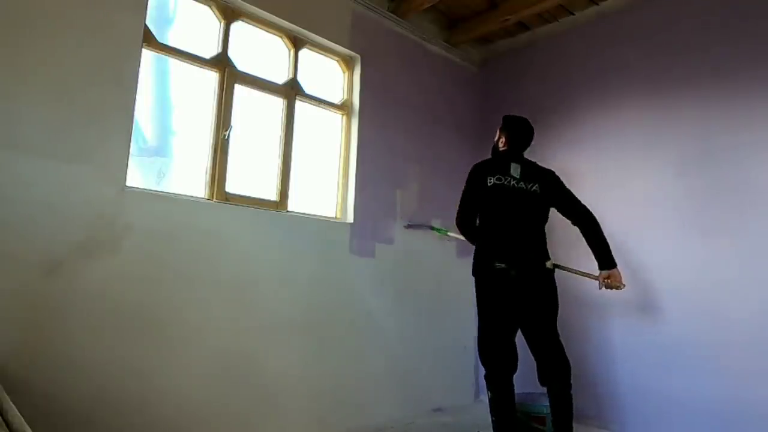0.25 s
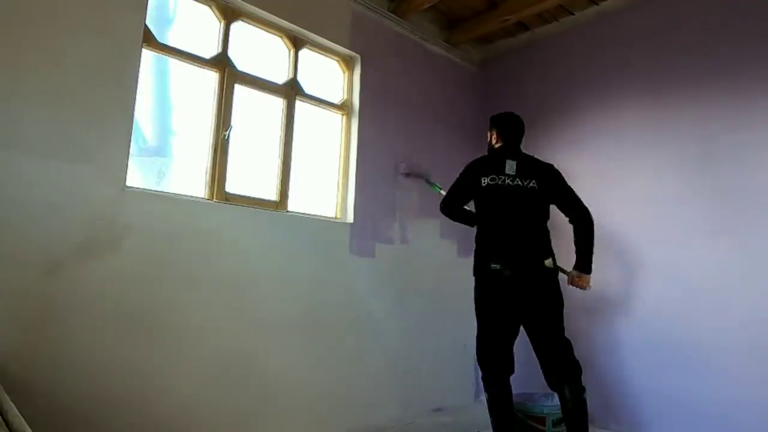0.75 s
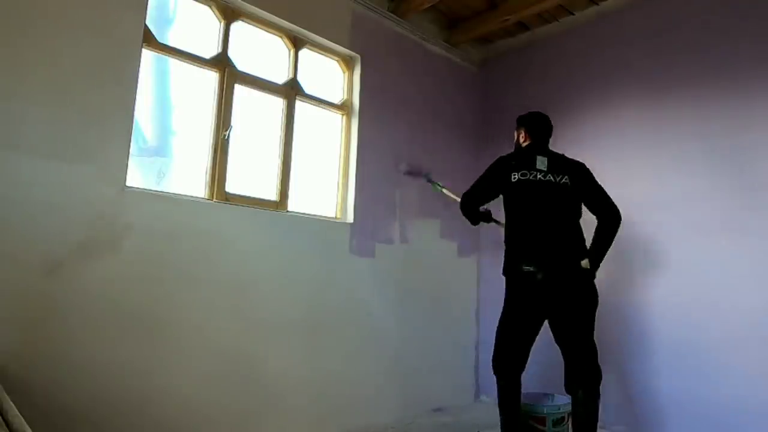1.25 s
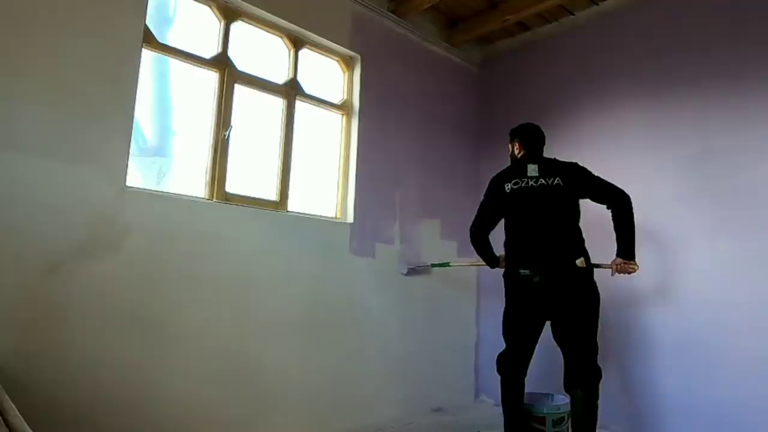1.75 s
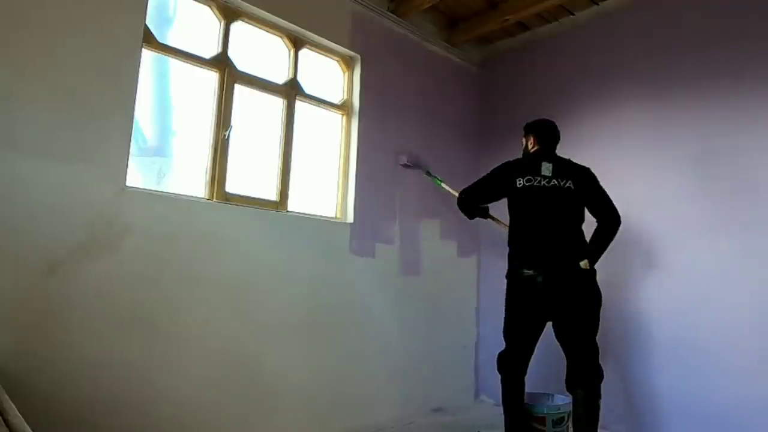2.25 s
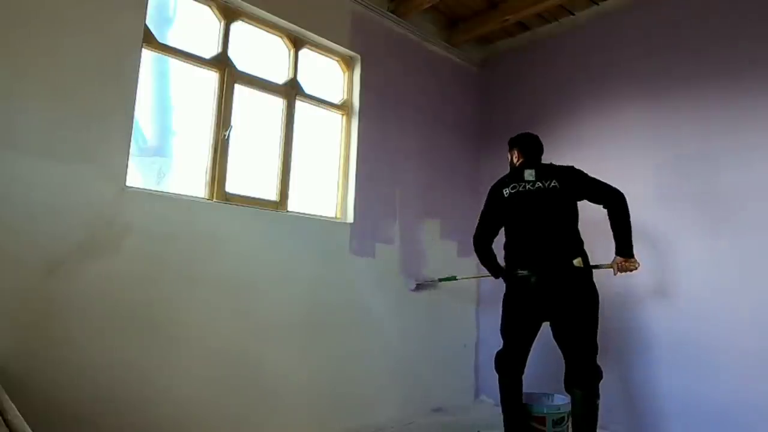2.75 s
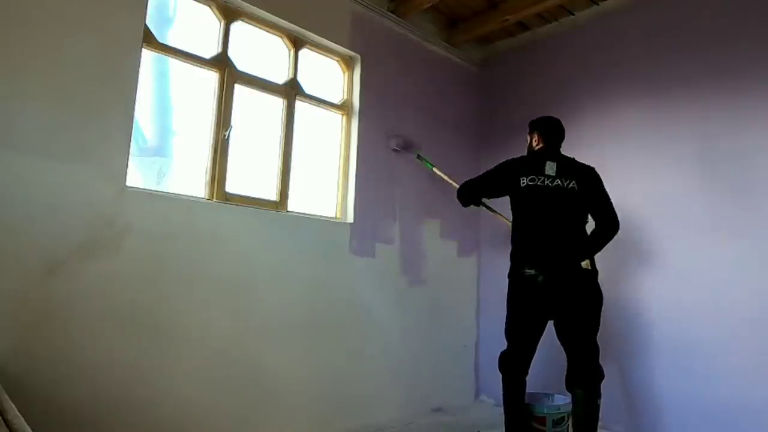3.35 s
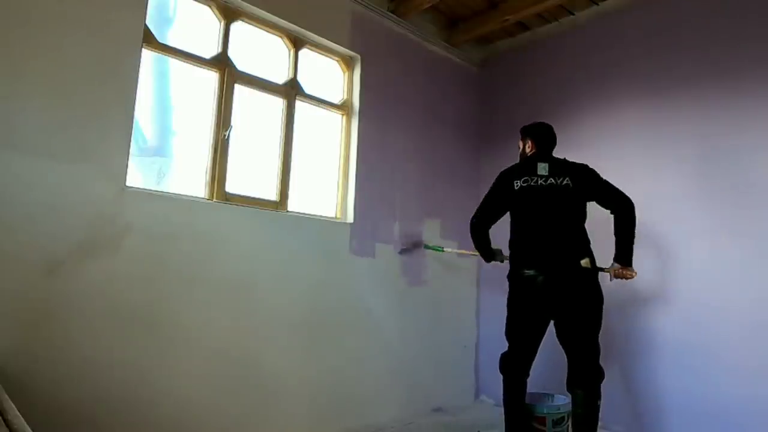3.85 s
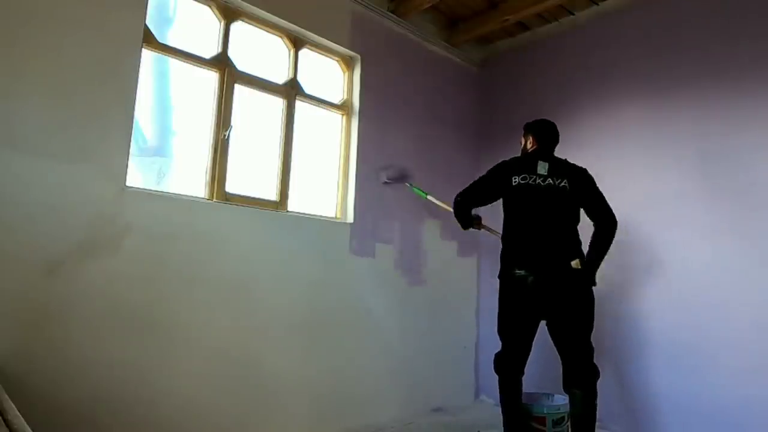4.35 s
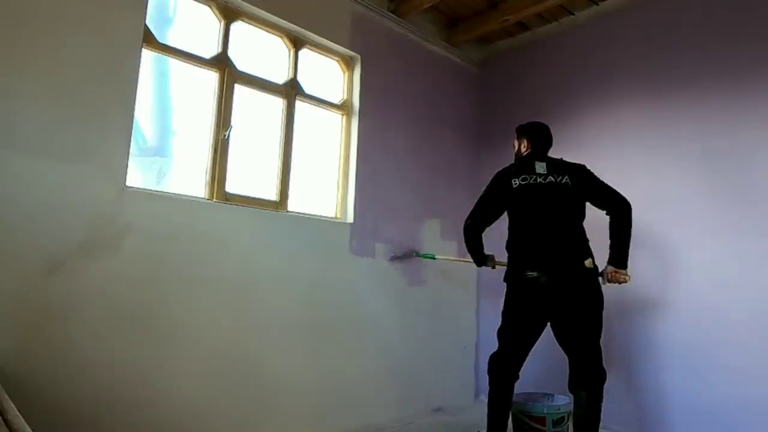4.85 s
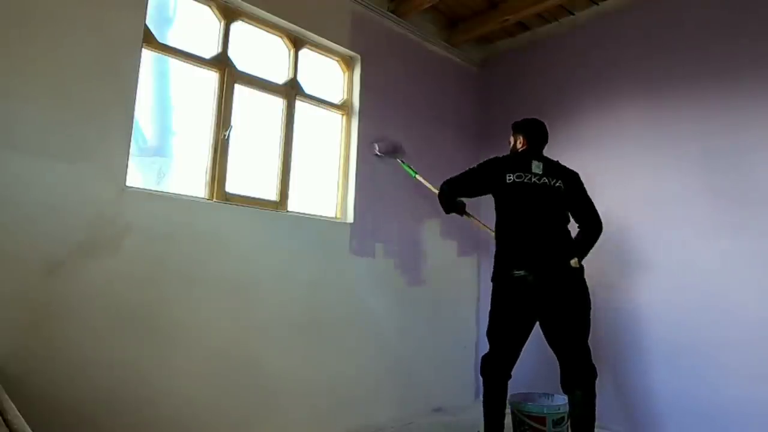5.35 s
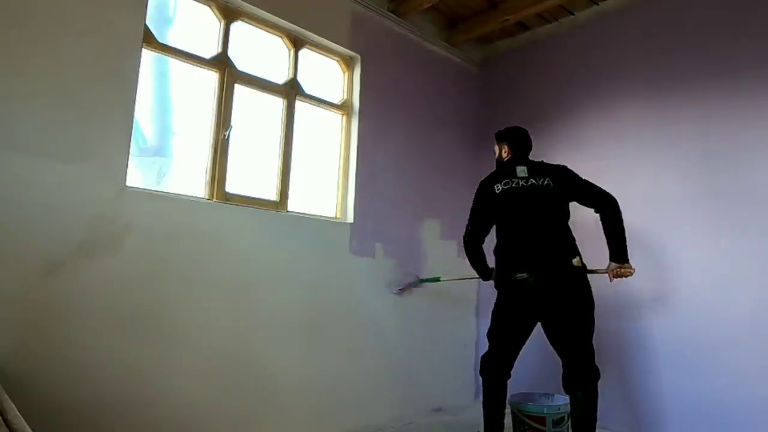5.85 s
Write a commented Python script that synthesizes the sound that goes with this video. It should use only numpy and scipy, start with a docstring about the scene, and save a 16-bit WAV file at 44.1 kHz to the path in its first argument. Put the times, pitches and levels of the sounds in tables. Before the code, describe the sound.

A wet nap roller on a long pole runs down and up plaster in an empty room. Each half-second stroke swells into a sticky, fine sizzle and gritty rub, then drops nearly away at the turn. A hollow drumming and deep, soft wall boom lie underneath. Short room echo, faint still air, close stereo pickup, modest level.

```python
"""Paint roller on plaster

A wet roller on a long pole runs down and up a plastered wall in a bare room. Random impulses make the
fine sizzle of snapping paint threads, the rub of the nap on plaster and the drumming of the hollow roller.
Filtered noise makes the booming wall, a brief hum of the pole and the still air.
The roller rings through changing echoes and, with the air, through narrow resonances; two close ports hear it.
"""
import sys
import numpy as np
from scipy import signal
from scipy.fft import rfft, irfft, next_fast_len
from scipy.io import wavfile
from scipy.ndimage import uniform_filter1d

SR = 44100
rng = np.random.default_rng(int(sys.argv[2]) if len(sys.argv) > 2 else 0)


def int16_out(signal):
    """Quantize to a 16-bit WAV file."""
    q = np.round(np.clip(np.atleast_2d(signal).T, -1, 1) * 32767)
    wavfile.write(sys.argv[1], SR, q.astype(np.int16))


N = 268564


def seconds():
    """Time of every sample."""
    return np.arange(N) / SR


def gain_of(db):
    """Amplitude gain from dB."""
    return 10 ** (np.asarray(db) / 20)


def evened(x):
    """Scales to an rms of one."""
    return x / np.sqrt(np.mean(x ** 2) + 1e-20)


def read(points, hz):
    """Interpolates a table on a log-frequency axis."""
    f, value = np.transpose(points)
    return np.interp(np.log(hz + 1), np.log(f + 1), value)


def filtered(x, response_at):
    """Applies a response given as a function of frequency."""
    size = next_fast_len(N + 8192)
    spectrum = rfft(x, size) * response_at(np.fft.rfftfreq(size, 1 / SR))
    return irfft(spectrum, size)[..., :N]


def coloured(x, spectrum):
    """Filters x by a spectrum table, then scales to an rms of one."""
    return evened(filtered(x, lambda hz: gain_of(read(spectrum, hz))))


def snaps(per_s, spread_db):
    """Random tiny impulses, a few larger than the rest; expected power is independent of rate."""
    chance = np.clip(per_s / SR, 1e-4, 1)
    size = gain_of(spread_db * np.minimum(rng.exponential(1, N), 4))
    sign = rng.choice([-1, 1], N)
    fires = rng.random(N) < chance
    return evened(size * sign * fires / np.sqrt(chance))


def swells(events, squareness=2):
    """Bell-shaped gains added in power; squarer ones hold longer and end faster."""
    t = seconds()
    power = 0
    for centre_s, width_s, level_db in events:
        distance = np.minimum(abs(2 * (t - centre_s) / width_s), 2 * np.pi)
        power = power + (gain_of(level_db) * np.exp(-distance ** squareness)) ** 2
    return np.sqrt(power)


# strokes, down and up by turns; levels before each sound's trim:
# (start_s, sizzle_db, rub_db, drum_db, push_peak_fraction, turn_level_db at start)
STROKES = [(-0.24, -50.5, -47, -66, 0.26, -63), (0.628, -44, -38, -42, 0.55, -60.5),
           (1.151, -43.5, -44, -44.5, 0.49, -66), (1.811, -43, -40.5, -44.5, 0.53, -59.5),
           (2.378, -43.7, -46, -47, 0.58, -59), (2.967, -42, -41, -43, 0.51, -55),
           (3.625, -42.5, -41, -46.5, 0.46, -58.5), (4.152, -41.5, -39, -45, 0.51, -53),
           (4.61, -43.5, -45.5, -45, 0.44, -56.5), (5.046, -41.8, -38.5, -46.5, 0.57, -52),
           (5.525, -42, -43.5, -45.5, 0.55, -54.5), (6.046, -43, -44, -47, 0.55, -55)]
LAST_TURN_S = 6.55


def travel(lag_s=0):
    """For every sample: stroke index, and fraction of that stroke done (0-1)."""
    turns_s = [row[0] for row in STROKES] + [LAST_TURN_S]
    done = np.interp(seconds() - lag_s, turns_s, np.arange(len(turns_s)))
    return np.minimum(done.astype(int), len(STROKES) - 1), done % 1


def stroke_gain(axis, power, turn_db=0, pushed=False):
    """One level column, arching with speed or push between turns, over the level left in the turns."""
    rows = np.array(STROKES)
    stroke, along = travel()
    start_s, *_, push_peak, turn_level_db = rows.T
    if pushed:
        # warp the arch so that it peaks at push_peak
        along = along ** (np.log(.5) / np.log(np.clip(push_peak[stroke], .05, .95)))
    rest = gain_of(np.interp(seconds(), start_s, turn_level_db) + turn_db)
    arch = gain_of(rows[stroke, axis]) * np.sin(np.pi * along) ** power
    return np.hypot(arch, rest)


# thread-snap spectrum: (freq_hz, relative_db_per_hz)
SIZZLE = [(300, -20.5), (1200, -4.5), (2500, -1.5), (3400, 0), (4500, 0), (6000, -3.5), (7800, -7),
          (9000, -13.5), (12400, -23), (15300, -40)]
# fine-spray spectrum: (freq_hz, relative_db_per_hz)
SPRAY = [(2000, -32), (5000, -4.5), (7700, 0), (9000, -4.5), (10700, -14), (12400, -6.5), (14000, -14.5),
         (15300, -31)]
# thick wet patches that sizzle louder, before trim: (centre_s, width_s, level_db)
WET_PATCHES = [(0.43, 0.12, -51.5), (0.88, 0.16, -44.5), (4.4, 0.091, -47.5), (4.86, 0.067, -43),
               (5.88, 0.04, -45.5)]
SIZZLE_POWER = 0.85  # exponent of the speed arch
SPRAY_FADE_DB_PER_S = 0.6


def paint(count=2):
    """Wet threads snap as the nap lifts, more at speed, with a fine spray that grows softer over time."""
    speed = np.hypot(stroke_gain(axis=1, power=SIZZLE_POWER), swells(WET_PATCHES))
    haste = evened(speed)
    sizzle = np.array([coloured(snaps(per_s=9000 * haste, spread_db=3.5), SIZZLE) for end in range(count)])
    spray = np.array([coloured(snaps(per_s=6000 * haste, spread_db=3.0), SPRAY) for end in range(count)])
    spray_gain = gain_of(-8.0 - SPRAY_FADE_DB_PER_S * seconds())
    return speed * (gain_of(3.0) * sizzle + spray_gain * haste ** 0.08 * spray)


# nap-on-plaster spectrum: (freq_hz, relative_db_per_hz)
RUB = [(200, -13.5), (500, -3), (830, -2.5), (980, 1.5), (1300, -1), (1900, 0.5), (3000, -4.5),
       (4500, -11.5), (8000, -45), (15000, -48)]
# short skids of the nap: (centre_s, width_s, level_db)
SKIDS = [(0.02, 0.073, -42), (2.2, 0.056, -37.5), (2.865, 0.031, -36.5), (3.411, 0.043, -37),
         (5.315, 0.027, -34)]
RUB_POWER, TURN_RUB_DB = 1.09, 3  # exponent of the push arch; offset from turn_level_db


def plaster(count=2):
    """The nap catches on grains of plaster as it is pushed, harder in a skid."""
    pressure = stroke_gain(axis=2, power=RUB_POWER, turn_db=TURN_RUB_DB, pushed=True)
    grit = np.array([coloured(snaps(per_s=3000, spread_db=3.0), RUB) for end in range(count)])
    return np.hypot(gain_of(-0.03) * pressure, swells(SKIDS)) * grit


# hollow-roller spectrum: (freq_hz, relative_db_per_hz)
DRUM = [(40, -11), (75, 0.5), (120, -7.5), (160, -3), (230, -3.5), (290, 1), (360, -1.5), (520, -1.5),
        (750, -7.5), (1500, -41), (5000, -70)]
# bumps in the wall, before trim: (centre_s, width_s, level_db)
BUMPS = [(0.03, 0.089, -44.5), (0.69, 0.05, -45), (1.56, 0.08, -45.5), (1.76, 0.067, -45.5),
         (2.78, 0.099, -45), (3.93, 0.08, -45), (5.29, 0.036, -42.5)]
DRUM_POWER, TURN_DRUM_DB = 1.33, -1.5  # exponent of the speed arch; offset from turn_level_db
LOW_DRUM_DB = 3.5  # louder at the bottom of travel, softer by as much at the top


def roller():
    """The uneven wall drums on the hollow roller and pole, most at a bump and when the roller is low."""
    stroke, along = travel()
    height = np.cos(np.pi * (stroke + along))  # 1 top, -1 bottom
    drumming = stroke_gain(axis=3, power=DRUM_POWER, turn_db=TURN_DRUM_DB)
    drumming = drumming * gain_of(-LOW_DRUM_DB * height)
    knocks = coloured(snaps(per_s=1200, spread_db=1.13), DRUM)
    return gain_of(-2.0) * np.hypot(drumming, swells(BUMPS)) * knocks


def lumps(depth_db):
    """The nap is unevenly loaded, so its grip flutters: 24 sines from 6 to 30 Hz, depth in dB rms."""
    t = np.arange(0, N + 256, 256) / SR  # coarse control grid
    wobble = sum(np.sin(2 * np.pi * (f * t + rng.random())) / f ** .25 for f in np.geomspace(6, 30, num=24))
    return gain_of(depth_db * np.interp(seconds(), t, evened(wobble)))


# reverberation of the bare room: (freq_hz, t60_s)
ROOM = [(100, 0.86), (300, 0.28), (1000, 0.38), (3000, 0.3), (7000, 0.21), (14000, 0.046)]


def response(early_db):
    """For each port: a cluster of reflections from the corner, then a tail whose treble dies first."""
    noise = rng.choice([-1., 1.], (2, SR // 2))
    hz, at_s, z = signal.stft(noise, SR, nperseg=256)
    tail = gain_of(-60 * at_s / read(ROOM, hz)[:, None])
    early = gain_of(early_db) * np.exp(-at_s / 0.0061)
    z = rfft(signal.istft(z * np.hypot(tail, early), SR, nperseg=256)[1])
    # even out the power over each run of 16 bins
    z = z / np.sqrt(uniform_filter1d(abs(z) ** 2, size=16, axis=1))
    return irfft(z)[:, :SR * 2 // 5]


def room(ends, count=14):
    """Changing echoes: looping responses swell and fade in sequence, fed by the roller's two ends in turn."""
    place = seconds() * 53  # response starts per s; each swell lasts two steps
    heard = np.zeros((2, N))
    for k in range(count):
        near = np.sin(np.pi / 2 * np.minimum((place - k) % count, 2))
        fed = np.float32(ends[k % 2] * near)[None]
        heard += signal.oaconvolve(fed, np.float32(response(early_db=7.0)), axes=1)[:, :N]
    return heard


# still-air spectrum: (freq_hz, relative_db_per_hz)
AIR = [(20, 3), (100, -24), (200, -0.5), (295, -5.5), (400, 0), (750, -14), (1050, -2.5), (3000, -11),
       (7000, -14), (15000, -36)]
AIR_DB = -55.5  # rms before room resonances and ports


def still_air():
    """Steady coloured noise of the room, independent in each channel."""
    return gain_of(AIR_DB) * coloured(rng.standard_normal((2, N)), AIR)


# narrow room resonances: (centre_hz, width_hz at half lift, lift_db)
RINGS = [(135, 7.4, 2.5), (173.7, 17, 5), (217, 16, 6.5), (265, 13.7, 6.5), (294, 5.9, 3), (313, 26, 5.5),
         (369, 21, 2.5), (445, 16, -1.5), (489, 20, -2), (999, 11, 5), (1093, 27, 1.5), (1620, 40, 0),
         (2200, 53, -2)]


def rings(hz):
    """Resonant gain against frequency; lifts add in dB over a 0.15 dB base."""
    lift_db = sum(db / (1 + (2 * (hz - f) / width_hz) ** 2) for f, width_hz, db in RINGS)
    return gain_of(lift_db + 0.15)


# low modes of wall and room: (centre_hz, width_hz at -6 dB, relative_db)
BOOM = [(26.4, 6.2, -5.5), (44.54, 9.4, 1.5), (88, 72, -19.5)]


def swing():
    """The lowest modes of wall and room, noise-driven, held at a nearly even strength."""
    def modes(hz):
        total = sum(gain_of(db) / (1 + 2j * (hz - f) / width_hz) ** 2 for f, width_hz, db in BOOM)
        return (hz > 0) * total

    wave = signal.hilbert(evened(filtered(rng.standard_normal(N), modes)))
    local_power = uniform_filter1d(abs(wave) ** 2, size=3000)
    return evened(wave.real / np.sqrt(local_power + 0.067))


# shoves of the pole, before trim: (centre_s, width_s, level_db)
SHOVES = [(0.22, 0.16, -43), (0.48, 0.12, -46.5), (0.85, 0.24, -37), (1.07, 0.15, -42.5),
          (1.79, 0.052, -44), (2.16, 0.35, -43), (2.72, 0.19, -40.5), (4.03, 0.15, -39),
          (4.44, 0.34, -38.5), (4.9, 0.24, -43), (5.07, 0.15, -37.5), (5.35, 0.27, -37.5), (5.8, 0.13, -39),
          (5.94, 0.14, -37)]
SHAKE_DB, SHAKE_REST_DB = -51.5, -74  # before trim: speed arch peak, constant floor
SHAKE_POWER, SHAKE_LAG_S = 1.7, 0.047  # exponent of the speed arch; delay behind the roller


def wall():
    """The rolling load keeps the wall swinging; a shove makes it boom."""
    along = travel(SHAKE_LAG_S)[1]
    rolling = gain_of(SHAKE_DB) * np.sin(np.pi * along) ** SHAKE_POWER + gain_of(SHAKE_REST_DB)
    strength = np.hypot(rolling, swells(SHOVES, squareness=3.1))
    return gain_of(0.35) * strength * np.array([swing(), swing()])


# hum as the pole takes the load in the first turn: (centre_s, width_s, level_db)
HUM = [(0.64, 0.096, -52)]
HUM_HZ, HUM_WIDTH_HZ = 292, 14  # centre; noise bandwidth at -6 dB, sets the waver


def pole():
    """The loaded pole hums briefly on one wavering note: narrow noise with its envelope flattened."""
    noise = rng.standard_normal(N)
    ring = filtered(noise, lambda hz: 1 / (1 + 2j * (hz - HUM_HZ) / HUM_WIDTH_HZ) ** 2)
    return swells(HUM) * evened(np.cos(np.angle(signal.hilbert(ring))))


# likeness of the two ports: (freq_hz, shared_amplitude_fraction)
LIKENESS = [(44, .993), (65, .93), (100, .88), (140, .8), (190, .97), (280, .996), (350, .945), (450, .95),
            (580, .895), (800, .78), (1100, .67), (1500, .63), (2500, .57), (3500, .47), (5000, .12),
            (7500, .2), (11000, .08)]
# port balance: (freq_hz, left_minus_right_db)
BALANCE = [(300, -0.4), (1000, 0.9), (2000, 1.5), (3000, 3), (4600, 0), (6000, -2), (7700, 1.2), (9400, -2),
           (10600, -3.5), (12200, 1.2), (14500, 2)]
RIGHT_LEAD_S = 5.2e-5


def ports(pair):
    """Two close ports hear nearly the same bass but different treble, the right one slightly sooner."""
    def same(hz):
        return np.clip(read(LIKENESS, hz), 0, 1)

    def right_gain(hz):
        return gain_of(-read(BALANCE, hz) / 2) * np.exp(2j * np.pi * hz * RIGHT_LEAD_S)

    right = filtered(pair[0], same) + filtered(pair[1], lambda hz: np.sqrt(1 - same(hz) ** 2))
    left = filtered(pair[0], lambda hz: gain_of(read(BALANCE, hz) / 2))
    return np.array([left, filtered(right, right_gain)])


def scene():
    """The roller in the room, over still air, the boom of the wall and the hum of the pole."""
    ends = paint() + plaster() + roller()  # own paint and grit at each end, drumming shared
    rolling = room(ends * lumps(depth_db=0.5))
    resonant = filtered(rolling + still_air(), rings)
    return ports(resonant + wall() + pole())


EDGE_HZ = 15300


def record(dry):
    """Band limit: linear-phase low-pass at EDGE_HZ."""
    lowpass = signal.firwin(511, EDGE_HZ, window=("kaiser", 9), fs=SR)
    return signal.oaconvolve(dry, lowpass[None], "same")


dry = scene()
out = record(dry)
int16_out(out)
```